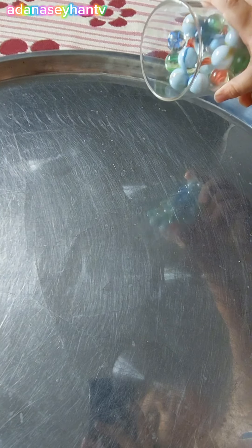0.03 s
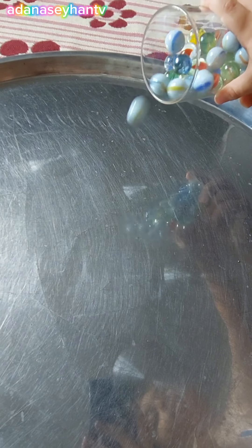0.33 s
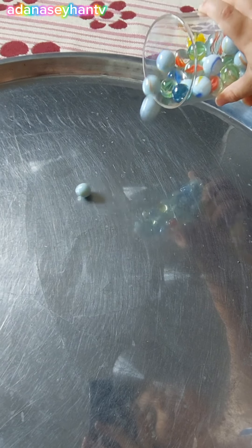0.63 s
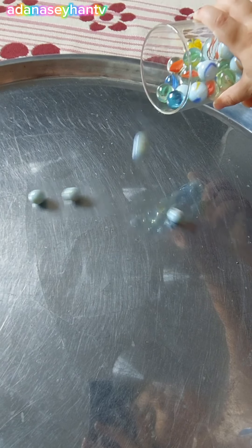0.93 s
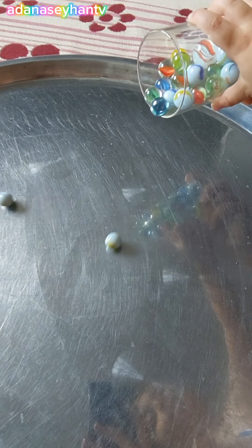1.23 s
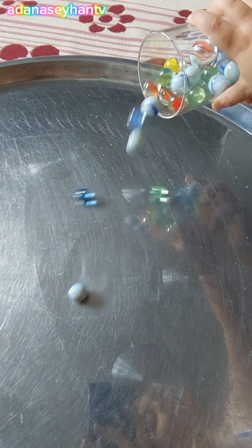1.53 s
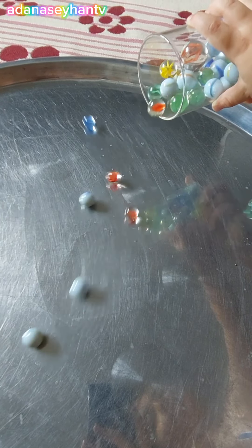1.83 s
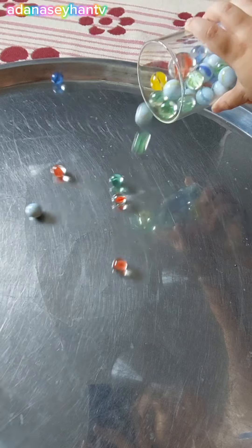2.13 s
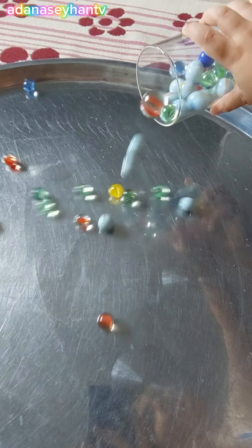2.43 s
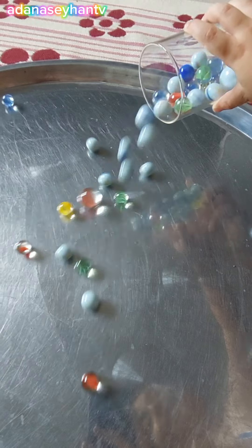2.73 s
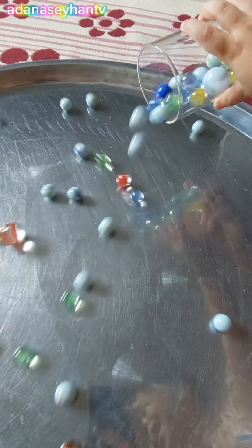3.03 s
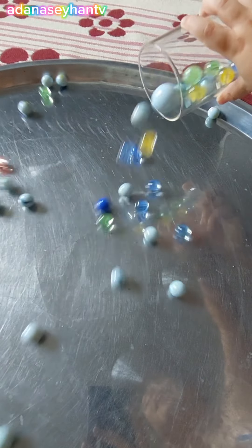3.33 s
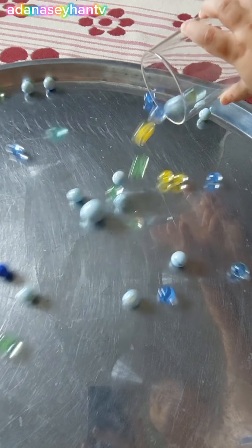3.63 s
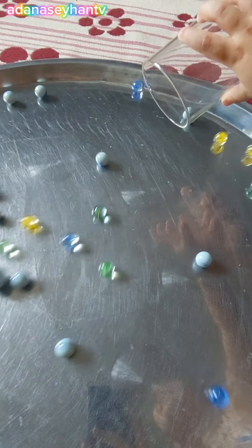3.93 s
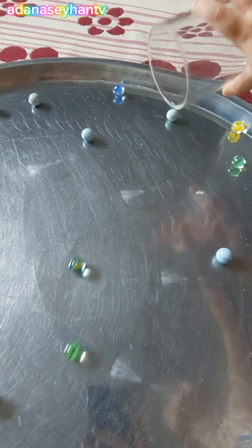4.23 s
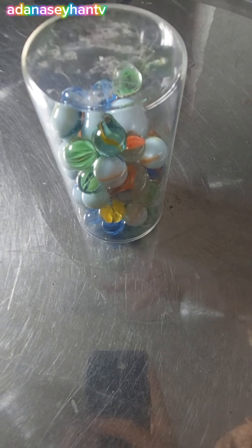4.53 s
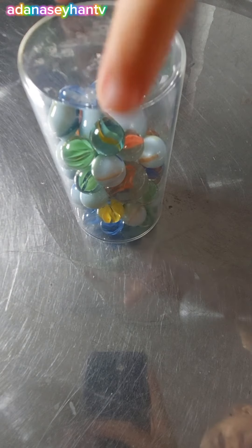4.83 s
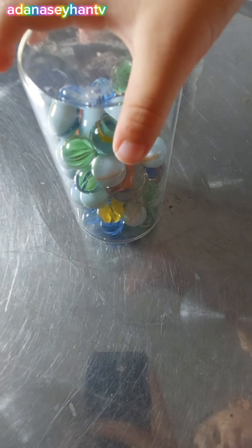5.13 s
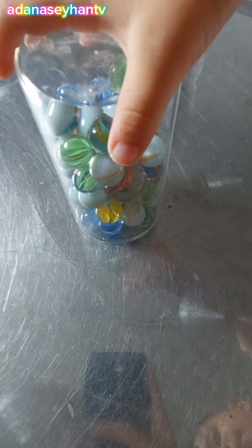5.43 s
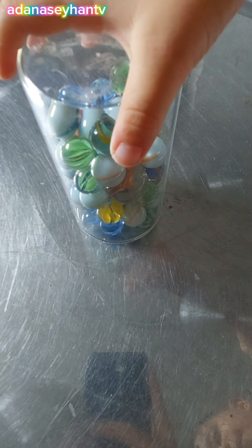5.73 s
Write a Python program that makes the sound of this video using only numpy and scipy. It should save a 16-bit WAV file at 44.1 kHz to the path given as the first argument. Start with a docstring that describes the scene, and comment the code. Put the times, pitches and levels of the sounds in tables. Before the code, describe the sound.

Close by in a small room, a cup of glass marbles is emptied onto a metal tray. Bright clinks come first, then separate hollow hits that build into a dense, ringing clatter, with marbles rolling about and clacking against the rim. The sound breaks off suddenly, leaving near silence with a low rumble, soft swishes of a hand, one dull bump and a few light finger taps on the cup.

```python
"""A cup tips in a small room and the glass marbles in it shift and clink. From 0.5 s they land on a wide
steel tray, each with a tick and a hollow thump of the sheet, then roll about and knock the rim; the tray
rings, and the cup chimes more freely as it empties. At 4.4 s the sound breaks off. In the quiet after
it, over faint rumble and hiss, a hand rustles, swishes in, then bumps and taps the refilled cup."""
import sys
import numpy as np
from scipy import signal
from scipy.fft import rfft, irfft, next_fast_len
from scipy.io import wavfile
from scipy.ndimage import map_coordinates

SR = 44100
rng = np.random.default_rng(int(sys.argv[2]) if len(sys.argv) > 2 else 0)


def wav_record(signal):
    """Record a signal, one row per channel, as 16-bit PCM in the file named by sys.argv[1]."""
    frames = np.transpose(np.atleast_2d(signal))
    bounded = np.clip(frames, -1, 1)
    # unit amplitude maps onto the largest positive 16-bit level
    quanta = np.round(bounded * 32767).astype(np.int16)
    wavfile.write(sys.argv[1], SR, quanta)


N = 264159
TIME_S = np.arange(N) / SR
BREAK_S, RESUME_S = 4.405, 4.45
TOUCH_RANGE_DB = 7


# landings on the sheet: t/s, relative level/dB
LANDINGS = [(.482, -17.5), (.797, -15), (.865, -15.5), (1.043, -17.5), (1.454, -16), (1.514, -17),
            (1.530, -22.5), (1.648, -18.5), (1.667, -23), (1.685, -19.5), (1.719, -17.5), (1.795, -16),
            (1.864, -19), (2.041, -16.5), (2.169, -18.5), (2.249, -21.5), (2.283, -18), (2.305, -21),
            (2.378, -19), (2.391, -17.5), (2.440, -20), (2.477, -17), (2.514, -15), (2.550, -16.5),
            (2.654, -12.5), (2.661, -20), (2.740, -17), (2.803, -18), (2.829, -24), (2.864, -19.5),
            (2.891, -16), (2.947, -16.5), (2.996, -17.5), (3.014, -25.5), (3.029, -22), (3.078, -17.5),
            (3.138, -23.5), (3.148, -19), (3.177, -16.5), (3.207, -18.5), (3.224, -21), (3.237, -16),
            (3.259, -21.5), (3.281, -20.5), (3.311, -16.5), (3.355, -16.5), (3.363, -19), (3.425, -20.5),
            (3.444, -24), (3.453, -25), (3.474, -16), (3.539, -12), (3.566, -30.5), (3.588, -24.5),
            (3.608, -24), (3.646, -21), (3.681, -17), (3.721, -28), (3.731, -20.5), (3.766, -18.5),
            (3.793, -20.5), (3.802, -17.5), (3.835, -21.5), (3.856, -19), (3.869, -25)]
# tick spectrum: f/Hz, level/dB
TICK_SPECTRUM = [(3000, -39.5), (6000, -13.5), (8500, -6), (12000, 4), (13500, -2.5), (15800, -12.5)]
# crack spectrum: f/Hz, level/dB
CRACK_SPECTRUM = [(60, -35), (160, -19.5), (300, -1.5), (500, -4.5), (750, -4.5), (1000, -3), (1250, -7),
                  (1800, -3.5), (2500, -8), (3600, -6.5), (7000, -15), (9000, -15), (15800, -35)]

def landings():
    """Glass on steel: a tick, plus bending waves as crack and thump, deeper under heavy marbles."""
    out = np.zeros((2, N))
    for s, db in LANDINGS:
        tick = contact(TICK_SPECTRUM, rise_s=.0002, hold_s=.003, ring_db=0, t60_s=.065)
        crack = contact(CRACK_SPECTRUM, rise_s=.001, hold_s=.005, ring_db=-2, t60_s=.09)
        swing = thump(hz=503, length_s=.0076, detune=.025)
        push = thump(hz=310, length_s=.005, detune=.1)
        excess_db = db + 17  # over an ordinary landing
        add(out, s, amp(db + 2) * swing)
        add(out, s, amp(-32.5 + 1.9 * excess_db) * push)
        add(out, s, amp(.64 * excess_db) * (amp(-18.5) * tick + amp(-17.5) * crack))
    return out


def thump(hz, length_s, detune, rise_s=.0007):
    """The sheet swings a few times under a marble before the bending wave runs off."""
    t = np.arange(1024) / SR
    pitch, stretch = np.exp(rng.standard_normal(2) * [detune, .1])
    shape = (1 - np.exp(-t / rise_s)) * np.exp(-(t / (length_s * stretch)) ** 4)
    return np.sqrt(2) * shape * np.sin(2 * np.pi * hz * pitch * t)


# glass on glass: t/s, relative level/dB, treble/dB, ring f/Hz
CLINKS = [(.063, -24.5, -11.5, 3830), (.081, -27, 1, 5370), (.093, -10, -3.5, 10190),
          (.102, -23.5, 3.5, 6730), (.109, -15, 1, 6730), (.14, -12.5, -1.5, 5720), (.16, -17.5, -9, 10210),
          (.177, -12, 5, 6330), (.188, -10.5, -2, 6430), (.232, -13, -0.5, 6460), (.242, -18.5, -3.5, 6550),
          (.262, -16.5, 0, 6570), (.278, -14.5, -2, 6515), (.295, -23, -1.5, 6850),
          (.31, -24.5, -2.5, 6640), (.344, -11, 5, 6350), (.355, -20, 5, 6430), (.414, -15.5, 0.5, 5930),
          (.434, -20, 0, 9110), (.467, -31.5, 0.5, 6600), (.51, -20, -6, 6600), (.52, -22.5, 3, 6630),
          (.603, -12, 2.5, 6220), (.765, -20.5, -1.5, 6860), (.847, -20, -11, 11200),
          (1.036, -17.5, -4.5, 5474), (1.095, -24, -4, 3740), (1.12, -24.5, -13, 7430),
          (1.254, -27.5, -8, 6280), (1.295, -31.5, -9, 6300), (1.423, -27, 3, 6550),
          (1.466, -15.5, 7, 10960), (1.486, -16, -5, 5050), (1.589, -20.5, 6.5, 5566),
          (1.626, -14.5, -0.5, 10120), (1.667, -27, 1.5, 3446), (2.019, -26, 1.5, 5560),
          (2.081, -13.5, -4, 5780), (2.151, -20.5, -4.5, 6430), (2.32, -12.5, -1.5, 4840),
          (2.351, -16.5, -1.5, 4916), (2.361, -16, 3.5, 5875), (2.428, -12, -1.5, 4770),
          (2.603, -14.5, -1.5, 10460), (2.621, -16.5, -1.5, 7130), (2.645, -15.5, -0.5, 10040),
          (2.785, -14.5, -8.5, 5420), (2.787, -16.5, -6, 3327), (2.866, -16.5, -3.5, 5456),
          (3.106, -14, -6, 5380), (3.228, -14.5, 3.5, 5350), (3.26, -19.5, -3, 4910), (3.49, -15, -3, 5070),
          (4.197, -26.5, 0.5, 5560)]
# click spectrum: f/Hz, level/dB
GLASS_SPECTRUM = [(100, -31.5), (400, -26), (900, -20.5), (1500, -12), (2200, -8), (2700, -6.5), (4300, -7),
                  (5400, -1), (6400, -0.5), (8000, -6.5), (10500, -2), (13000, -4.5), (15800, -17)]

def clinks(rows):
    """Marbles collide: a crisp click and a brief high ring."""
    out = np.zeros((2, N))
    for s, db, treble_db, hz in rows:
        click = contact(GLASS_SPECTRUM, rise_s=.0004, hold_s=.0042, ring_db=-8, t60_s=.045,
                        treble_db=treble_db, uneven_db=3)
        add(out, s, amp(db - 2) * (click + amp(-4) * glass_ring(hz, count=3)))
    return out


def glass_ring(hz, count, spread=.03, rise_s=.0003, t60_s=.051):
    """A cluster of close glass modes, in a different phase at each microphone."""
    t = np.arange(2048) / SR
    modes_hz = hz * (1 + spread * (np.linspace(-1, 1, count) + rng.normal(0, .5, count)))
    ring = np.sin(2 * np.pi * (modes_hz[:, None] * t + rng.random((2, count, 1)))).sum(axis=1)
    return np.sqrt(2 / count) * ring * (1 - np.exp(-t / rise_s)) * amp(-60 * t / t60_s)


# knocks on the rim: t/s, relative level/dB, treble/dB
RIM_KNOCKS = [(.529, -26, -9), (1.558, -17.5, -10), (1.603, -24, -16.5), (1.765, -23, -3.5),
              (1.943, -20.5, -9), (1.984, -23, -17), (2.081, -16, -2), (2.102, -22, -7),
              (2.141, -19.5, -3.5), (2.203, -21.5, -8), (2.263, -18.5, -7), (3.095, -19, -4.5),
              (3.15, -20, -10), (3.195, -20.5, -9.5), (3.645, -16, -1), (3.692, -19, -4.5),
              (3.705, -19.5, -13.5), (3.77, -14.5, -8.5), (3.915, -21, -12), (3.946, -18, -13),
              (3.962, -16, -4), (3.984, -18.5, -8.5), (4.026, -17, -10), (4.035, -17.5, -3.5),
              (4.082, -24, -6.5), (4.093, -19.5, -7), (4.144, -25, -9), (4.213, -16.5, -6.5),
              (4.268, -19, -9.5), (4.283, -20.5, -6.5), (4.319, -21, -11), (4.354, -25, -10.5)]
# clack spectrum: f/Hz, level/dB
RIM_SPECTRUM = [(100, -29.5), (500, -14.5), (800, 1), (1150, -5), (1450, 0), (1900, 1.5), (2700, -5),
                (4000, -6.5), (6000, -9.5), (8500, -7.5), (12000, -1.5), (15800, -11.5)]

def rim_knocks(light_count, light_treble_db=-12):
    """Sideways blows on the stiff rim clack with no thump; light ones follow the rolling."""
    moment, softness = rng.random((light_count, 2)).T
    light_s = moment * BREAK_S
    light_db = roll_level_db(light_s) + 2.5 - TOUCH_RANGE_DB * softness
    light = zip(light_s, light_db, np.full(light_count, light_treble_db))
    out = np.zeros((2, N))
    for s, db, treble_db in [*RIM_KNOCKS, *light]:
        clack = contact(RIM_SPECTRUM, rise_s=.0006, hold_s=.0055, ring_db=-1, t60_s=.075,
                        treble_db=treble_db, uneven_db=2.5)
        add(out, s, amp(db - 1) * clack)
    return out


def jostle(count, fall_s=.13, smooth_s=.069, full_flow_per_s=17):
    """Marbles crowd the lip of the cup, touching harder the more are about to fall."""
    moment, softness = rng.random((count, 2)).T
    s = moment * BREAK_S
    nearness = np.exp(-(since_landings_s(s + fall_s) / smooth_s) ** 2 / 2)
    flow_per_s = nearness.sum(axis=1) / (smooth_s * np.sqrt(2 * np.pi))
    flow_db = 20 * np.log10(np.clip(flow_per_s / full_flow_per_s, 1e-6, 1))
    top_db = np.maximum(-22.5 + 2.2 * flow_db, -36.5)
    return touches(s, softness, top_db)


def tip_rattle(count, start_s=.005, end_s=.59):
    """The pile shifts in the tilting cup: light touches, ever denser."""
    moment, softness = rng.random((count, 2)).T
    s = start_s + np.sqrt(moment) * (end_s - start_s)
    return touches(s, softness, top_db=-34.5)


def touches(s, softness, top_db, centre_hz=5580, dull_db=14):
    """Light glass contacts, each at its own pitch; softer ones are duller."""
    hz = centre_hz * np.exp(.088 * rng.standard_normal(len(s)))
    return clinks(zip(s, top_db - TOUCH_RANGE_DB * softness, -dull_db * softness, hz))


# rolling spectrum: f/Hz, level/dB
ROLL_SPECTRUM = [(40, -35), (160, -2.5), (300, 3), (500, 11.5), (780, 7.5), (1150, 0.5), (1420, 3),
                 (1850, -4), (2500, -1.5), (4500, -16.5), (8200, -17.5), (12300, -21), (16000, -27.5)]

def rolling():
    """Slightly uneven marbles chatter over scratched steel."""
    grid_s = TIME_S[::256]
    level_db = np.interp(TIME_S, grid_s, roll_level_db(grid_s))
    return amp(level_db + .61 * wobble(25) + .97 * wobble(220)) * long_noise(ROLL_SPECTRUM)


def roll_level_db(s, marble_db=-45.5, attack_s=.049, fade_db_per_s=13.5):
    """Each landed marble rolls off and slows; their powers add."""
    age_s = np.maximum(since_landings_s(s), 0)
    each = np.minimum(age_s / attack_s, 1) * amp(marble_db - fade_db_per_s * age_s)
    return 10 * np.log10((each ** 2).sum(axis=1) + 1e-12)


# tray modes: f/Hz, relative level/dB, t60/s
TRAY_MODES = [(506, -11, .55), (743, -8, .6), (1080, -6, .55), (1417, -4, .5), (1793, 1, .25),
              (2159, -5, .5), (2463, -7, .45), (3600, -6, .45), (4818, -5, .5)]

def tray_ring(landed, rolled):
    """Sustained contact builds up the tray's long modes more than a landing does."""
    return amp(-51.5) * resonate(rolled + amp(-2) * landed, TRAY_MODES)


# cup modes: f/Hz, relative level/dB, t60/s
CUP_MODES = [(2550, -8, 0.3), (3400, -5.5, 0.26), (6470, -2.5, 0.19), (10200, -0.5, 0.099)]

def cup_ring(glass, full_db=-53, empty_db=-42.5):
    """Marbles damp the cup; each one that leaves lets it chime louder."""
    drive_db = np.interp(TIME_S, np.array(LANDINGS)[:, 0], np.linspace(full_db, empty_db, len(LANDINGS)))
    return resonate(glass * amp(drive_db), CUP_MODES)


# wash spectrum: f/Hz, level/dB
WASH_SPECTRUM = [(150, -5.5), (300, -6.5), (500, -7), (1000, -2), (3000, 1), (7000, 0), (13000, -9)]
# decay of tray and room together: f/Hz, t60/s
WASH_DECAY = [(150, 0.95), (530, 0.61), (1400, 0.35), (3700, 0.34), (7000, 0.16), (11000, 0.39),
              (16000, 0.76)]

def wash(x, wet_db, onset_s, patterns):
    """Dense tray modes and room echoes; each stretch of time has its own pattern, as marbles move."""
    out = np.zeros((2, N))
    for part in np.array_split(np.arange(N), patterns):
        white = noise([(1, 0), (SR, 0)], size=24000)
        hz, t, bins = signal.stft(white, SR, nperseg=256)
        gain_db = along(WASH_SPECTRUM, hz)[:, None] - 60 * t / along(WASH_DECAY, hz)[:, None]
        tail = signal.istft(bins * amp(gain_db), SR, nperseg=256)[1]
        tail *= 1 - np.exp(-(np.arange(tail.shape[1]) / SR / onset_s) ** 2)
        add(out, part[0] / SR, signal.fftconvolve(x[:, part], tail, axes=1))
    return amp(wet_db) * out


def bump(s, hz, db, length_s):
    """The hand settles on the cup: a soft, very low swing of the tray, on the right."""
    t = TIME_S - s
    shape = np.exp(-((t - length_s) / length_s) ** 2) * (t > 0)
    return -amp(db) * shape * np.sin(2 * np.pi * hz * t) * amp([[-30], [0]])


# fingers on the cup: t/s, relative level/dB
TAPS = [(4.733, -65), (4.944, -51.5), (5.272, -65), (5.291, -49), (5.303, -58), (5.388, -71)]

def taps(knock_s=4.953):
    """Fingers tap the standing cup crisply; the hand meets it with a dull knock."""
    out = np.zeros((2, N))
    for s, db in TAPS:
        click = contact(GLASS_SPECTRUM, rise_s=.00017, hold_s=.0016, ring_db=-20, t60_s=.05,
                        treble_db=-2.5)
        add(out, s, amp(db) * (click + amp(-17) * glass_ring(hz=3500, count=5)))
    knock = contact(CRACK_SPECTRUM, rise_s=.002, hold_s=.01, ring_db=-2, t60_s=.09)
    add(out, knock_s, amp(-53) * knock)
    return out + wash(out, wet_db=-27, onset_s=.0093, patterns=1)


# swishes of the hand: t/s, hold/s, start f/Hz, width/Hz, relative level/dB
SWISHES = [(4.841, 0.045, 3630, 200, -58.5), (4.926, 0.053, 2940, 260, -55), (5.018, .02, 1940, 350, -65),
           (5.16, 0.019, 3350, 750, -58.5)]

def swishes(sag_hz_per_s=4300, overtone_db=-21):
    """The hand closes on the cup: narrow noise bands, each sinking in pitch."""
    out = np.zeros((2, N))
    for s, hold_s, start_hz, width_hz, db in SWISHES:
        centre_hz = np.clip(start_hz - sag_hz_per_s * (TIME_S - s), start_hz / 2, start_hz)
        fuzz = unit(filtered(rng.standard_normal(N), lambda hz: 1 / (1 + (hz / width_hz) ** 2)))
        phase = 2 * np.pi * np.cumsum(centre_hz) / SR
        tone = np.sin(phase) + amp(overtone_db) * np.sin(2 * phase)
        out += amp(db) * envelope(s, hold_s, attack_s=.026, t60_s=.31) * fuzz * tone
    return out


# strokes of the hand: t/s, hold/s, level/dB
RUSTLES = [(4.46, 0.073, -59), (4.58, .08, -64), (4.99, 0.032, -68), (5.148, 0.033, -71),
           (5.336, .03, -64.5), (5.734, .15, -68)]
# rustle spectrum: f/Hz, level/dB
RUSTLE_SPECTRUM = [(300, -17), (700, -12), (900, 3.5), (1200, -6.5), (1500, 1.5), (1900, -1), (2700, 0.5),
                   (3800, -4), (7000, -6.5), (10000, -19), (16000, -21)]

def rustles():
    """Grainy strokes of the hand, each with its own faint resonances, on the left."""
    out = np.zeros((2, N))
    for s, hold_s, db in RUSTLES:
        shape = envelope(s, hold_s, attack_s=.021, t60_s=.35)
        out += amp(db) * shape * long_noise(RUSTLE_SPECTRUM, uneven_db=3)
    return out * amp(1.34 * wobble(150)) * amp([[0], [-17]])


# rumble spectrum: f/Hz, level/dB
RUMBLE_SPECTRUM = [(25, -1), (58, 4), (100, -15), (200, -21), (400, -40), (1000, -58), (16000, -79)]
# hiss spectrum: f/Hz, level/dB
HISS_SPECTRUM = [(200, 4), (500, -18.5), (1100, -16.5), (3000, -23), (7000, -22.5), (16000, -30.5)]

def room_tone():
    """Rumble on the right, hiss on the left; more rumble and less hiss after the pour."""
    pouring = TIME_S < BREAK_S
    rumble = amp(np.where(pouring, -66.5, -54.5) + 1.8 * wobble(9)) * long_noise(RUMBLE_SPECTRUM)
    hiss = amp(np.where(pouring, -62.5, -67) + 1.2 * wobble(12)) * long_noise(HISS_SPECTRUM)
    return rumble * amp([[-22], [0]]) + hiss * amp([[0], [-17]])


# likeness of left and right: f/Hz, correlation
CORRELATION = [(200, 0.97), (550, 0.67), (900, .4), (1500, 0), (16000, 0)]

def noise(spectrum, size, treble_db=0, uneven_db=0):
    """Stereo noise of rms 1, alike in the bass, with a treble shelf and random peaks."""
    hz = np.fft.rfftfreq(size, 1 / SR)
    peaks = np.interp(np.sqrt(hz / hz[-1]), np.linspace(0, 1, 40), rng.standard_normal(40))
    shelf = np.clip(np.log2((hz + 1) / 4500), 0, 1)
    gain = amp(along(spectrum, hz) + treble_db * shelf + uneven_db * peaks)
    width_rad = np.arccos(np.clip(along(CORRELATION, hz), -1, 1)) / 2
    bins = rfft(rng.standard_normal((2, size))) * gain
    mid, side = irfft(bins * [np.cos(width_rad), np.sin(width_rad)], size)
    return unit(np.array([mid + side, mid - side]))


def long_noise(spectrum, uneven_db=0):
    """Stereo noise, N samples."""
    return noise(spectrum, next_fast_len(N), uneven_db=uneven_db)[:, :N]


def contact(spectrum, rise_s, hold_s, ring_db, t60_s, treble_db=0, uneven_db=2):
    """A hard contact: milliseconds of dense modes, then a short ring."""
    t = np.arange(2048) / SR
    shape = (1 - np.exp(-t / rise_s)) * (np.exp(-(t / hold_s) ** 2) + amp(ring_db - 60 * t / t60_s))
    shape /= np.sqrt(np.mean(shape[t < .006] ** 2))
    return shape * noise(spectrum, len(t), treble_db, uneven_db)


def resonate(x, modes):
    """Every blow feeds the same modes, in a different phase at each microphone."""
    t = np.arange(SR) / SR
    ring = np.zeros((2, SR))
    for hz, db, t60_s in modes:
        phase = 2 * np.pi * (rng.random() + rng.random((2, 1)) * (1 - along(CORRELATION, hz)))
        ring += amp(db - 60 * t / t60_s) * np.sin(2 * np.pi * hz * t + phase)
    return signal.fftconvolve(x, ring, axes=1)[:, :N]


def since_landings_s(s):
    """Age of each landing (columns) at times s (rows)."""
    return s[:, None] - np.array(LANDINGS)[:, 0]


def envelope(s, hold_s, attack_s, t60_s):
    """From time s: linear rise, hold, exponential decay."""
    t = TIME_S - s
    return np.clip(t / attack_s, 0, 1) * amp(-60 * np.maximum(t - attack_s - hold_s, 0) / t60_s)


def wobble(knots_per_s):
    """Smooth random curve."""
    knots = rng.standard_normal(int(N * knots_per_s / SR) + 4)
    return map_coordinates(knots, [TIME_S * knots_per_s / SR])


def filtered(x, gain):
    """Apply gain(hz)."""
    size = next_fast_len(N + 8192)
    return irfft(rfft(x, size) * gain(np.fft.rfftfreq(size, 1 / SR)), size)[..., :N]


def along(points, hz):
    """Interpolate (f/Hz, value) points on a log axis."""
    points_hz, values = np.transpose(points)
    return np.interp(np.log(hz + 1), np.log(points_hz + 1), values)


def add(track, s, sound):
    """Mix in a sound at time s."""
    part = track[..., max(0, round(s * SR)):][..., :sound.shape[-1]]
    part += sound[..., :part.shape[-1]]


def pan(left_db):
    """Channel gains for left minus right."""
    return amp(left_db * np.array([[.5], [-.5]]))


def amp(db):
    """dB to gain."""
    return 10 ** (np.asarray(db) / 20)


def unit(x):
    """Scale to rms 1."""
    return x / np.sqrt(np.mean(x ** 2) + 1e-20)


# balance of the pour: f/Hz, left minus right/dB
BALANCE = [(100, -3), (350, 2.5), (700, 0.5), (1400, -3), (2800, -1.5), (5500, -0.5), (9000, -3),
           (15000, -8)]

def scene(fade_s=.0057, low_cut_hz=85):
    """The pour, a moment of silence, then the hand on the cup."""
    landed = landings()
    rolled = rim_knocks(light_count=75) + rolling()
    steel = landed + rolled + tray_ring(landed, rolled)
    glass = clinks(CLINKS) + tip_rattle(count=24) + jostle(count=280)
    glass += cup_ring(glass)
    pour = steel * pan(-1.2) + glass * pan(1.6)
    pour += wash(pour, wet_db=-33, onset_s=.0016, patterns=20)
    # a low cut thins the deep bass of the whole pour
    pour = filtered(pour, lambda hz: (hz ** 2 / (hz ** 2 + low_cut_hz ** 2)) ** 2 * pan(along(BALANCE, hz)))
    pour *= np.clip((BREAK_S - TIME_S) / fade_s, 0, 1)
    quiet = room_tone() + rustles()
    quiet += (taps() + swishes()) * amp([[3], [-20]])
    quiet += bump(s=4.953, hz=56, db=-23.5, length_s=.014)
    quiet += bump(s=4.951, hz=126, db=-26, length_s=.0065)
    return pour + quiet * ((TIME_S < BREAK_S) | (TIME_S > RESUME_S))


def record(dry, top_hz=16000):
    """A nearby phone rounds the highest peaks and limits the band."""
    rounded = dry / (1 + np.abs(dry) ** 6) ** (1 / 6)
    return filtered(rounded, lambda hz: 1 / (1 + (hz / top_hz) ** 120))


dry = scene()
out = record(dry)
wav_record(out)
```